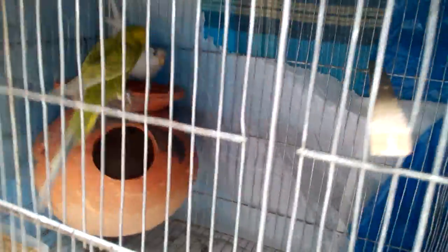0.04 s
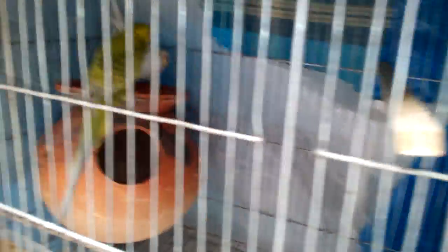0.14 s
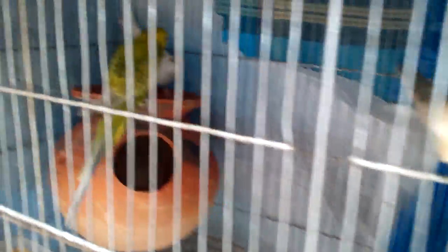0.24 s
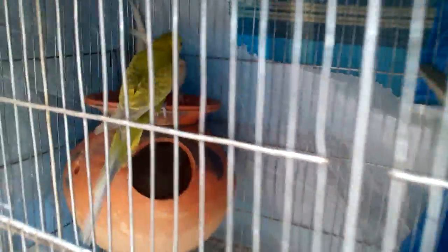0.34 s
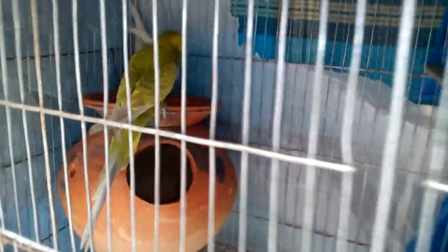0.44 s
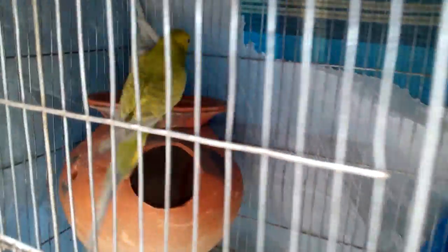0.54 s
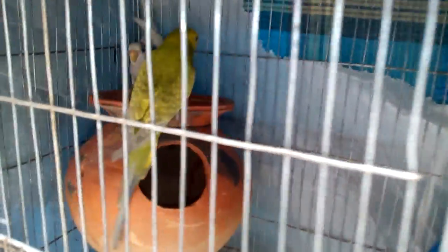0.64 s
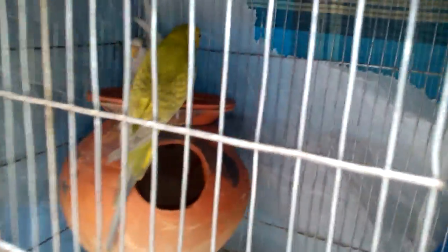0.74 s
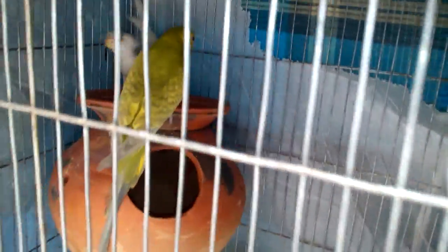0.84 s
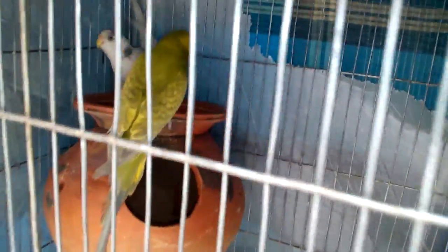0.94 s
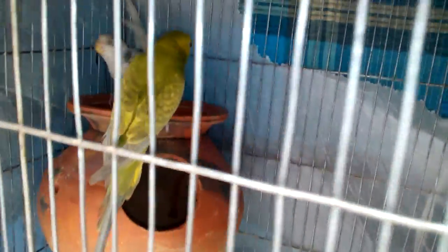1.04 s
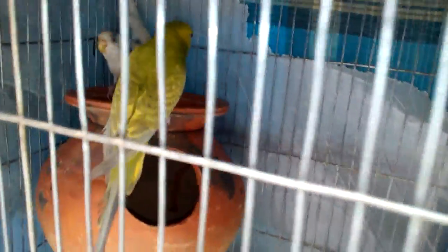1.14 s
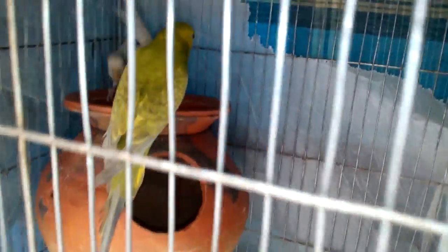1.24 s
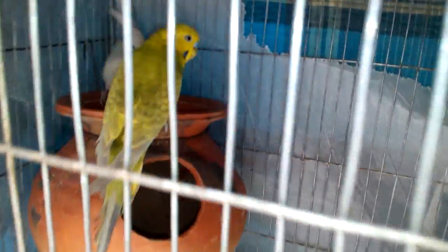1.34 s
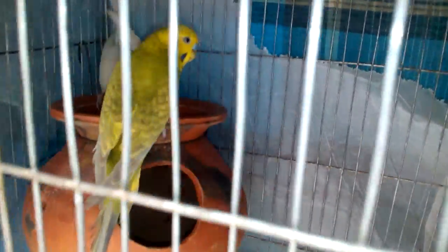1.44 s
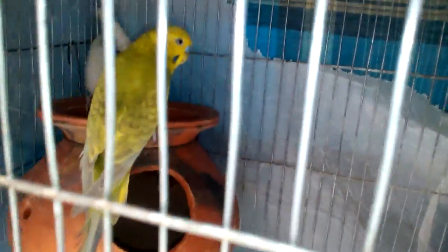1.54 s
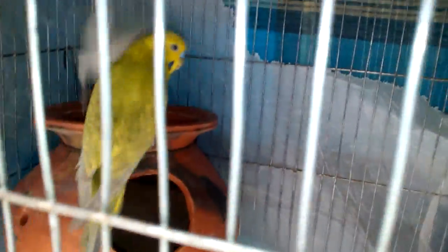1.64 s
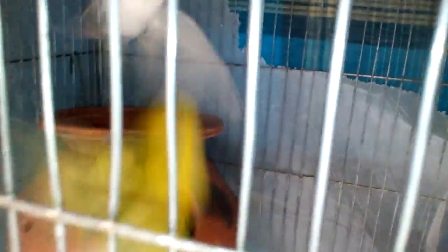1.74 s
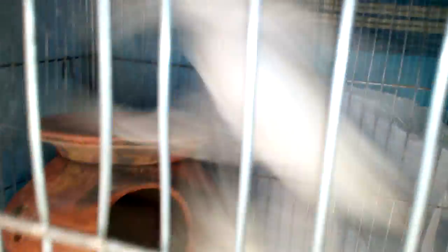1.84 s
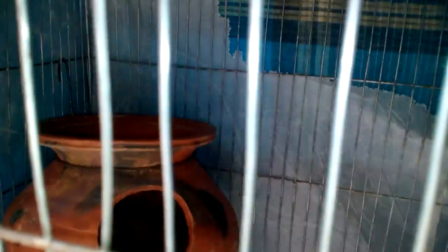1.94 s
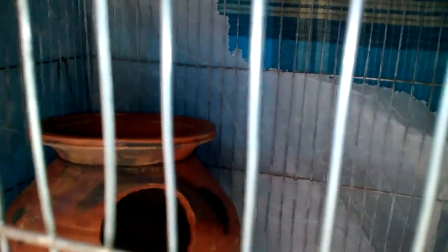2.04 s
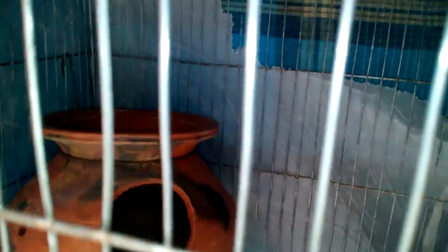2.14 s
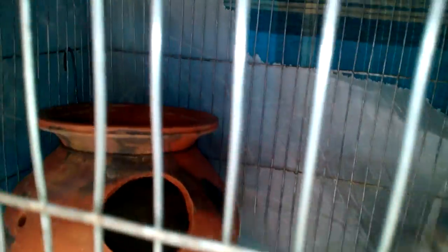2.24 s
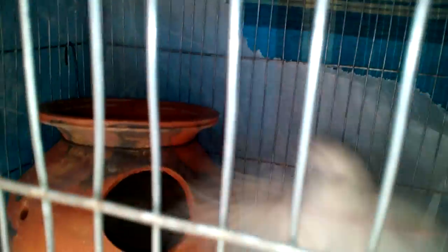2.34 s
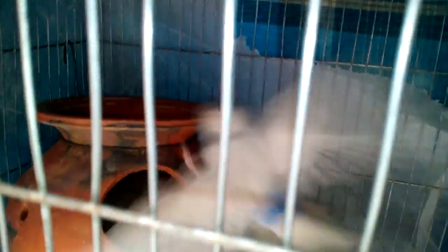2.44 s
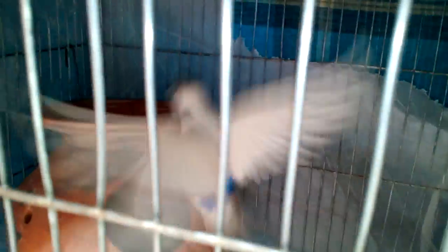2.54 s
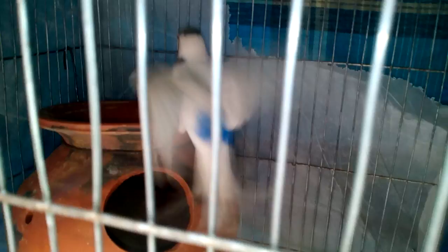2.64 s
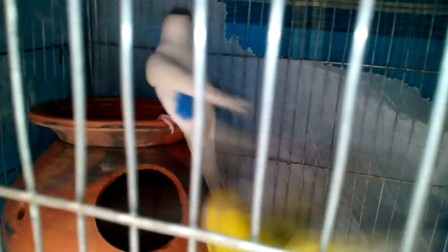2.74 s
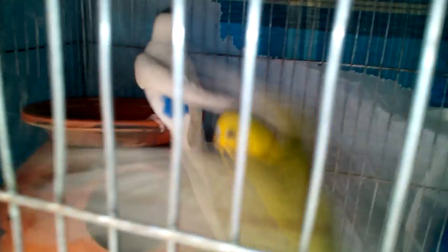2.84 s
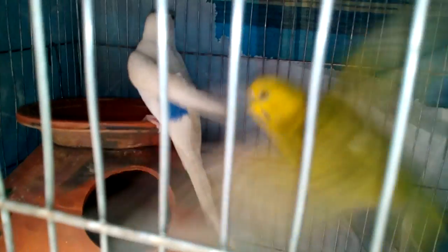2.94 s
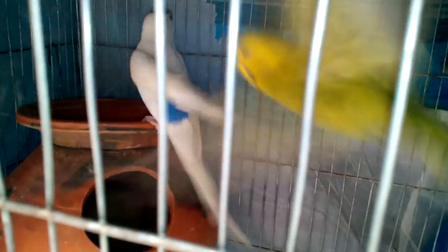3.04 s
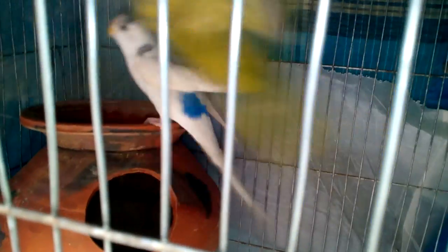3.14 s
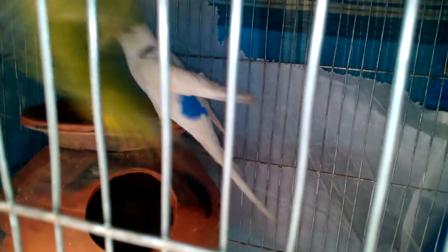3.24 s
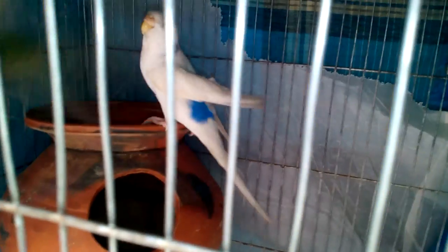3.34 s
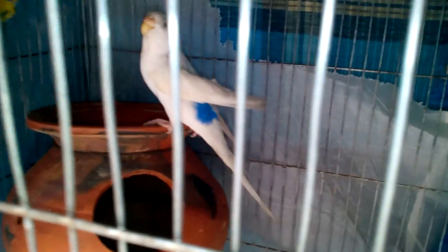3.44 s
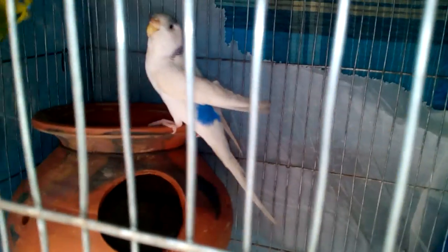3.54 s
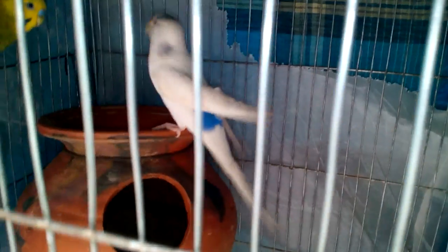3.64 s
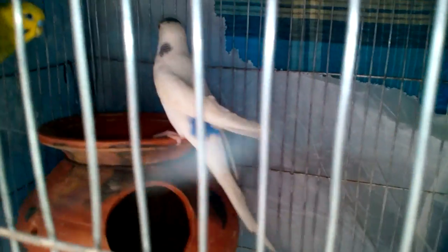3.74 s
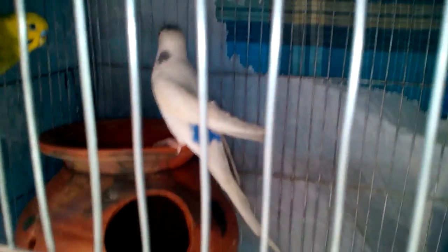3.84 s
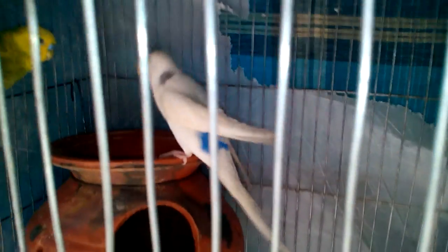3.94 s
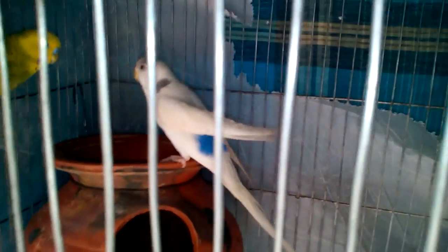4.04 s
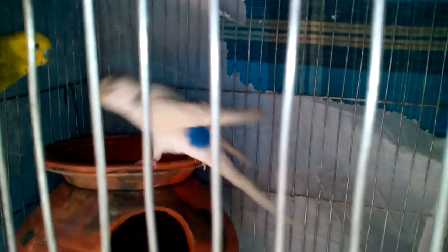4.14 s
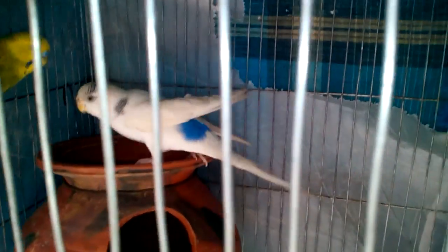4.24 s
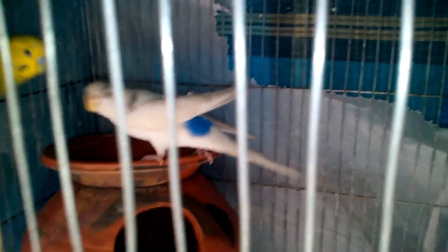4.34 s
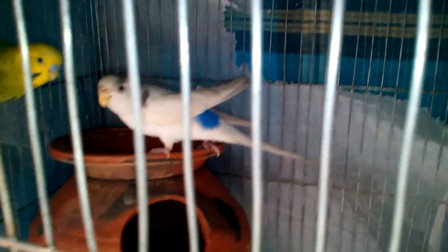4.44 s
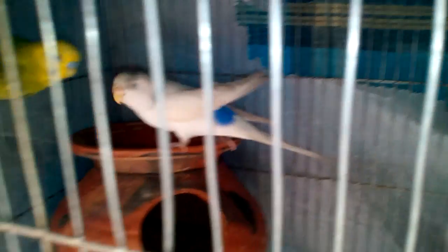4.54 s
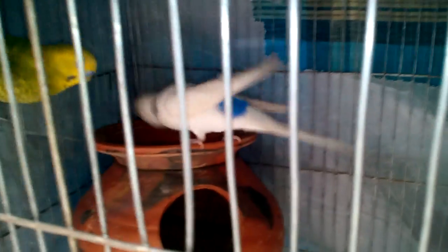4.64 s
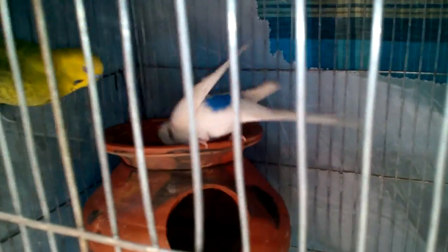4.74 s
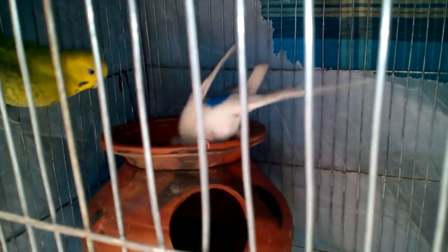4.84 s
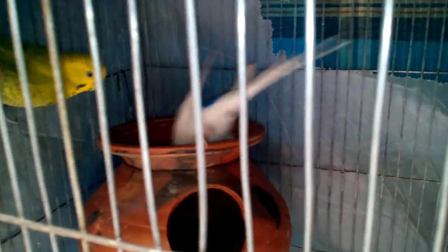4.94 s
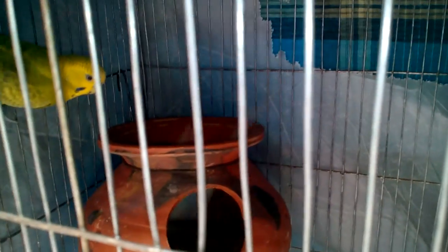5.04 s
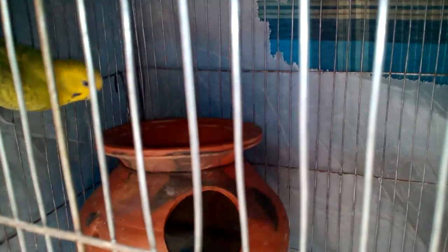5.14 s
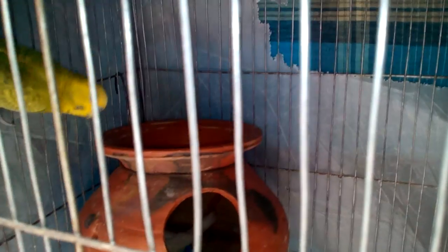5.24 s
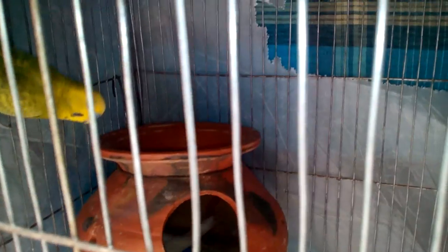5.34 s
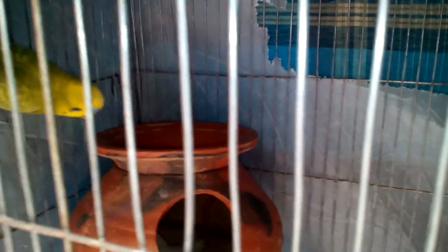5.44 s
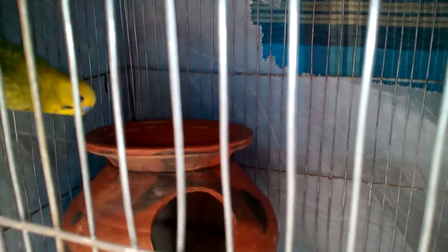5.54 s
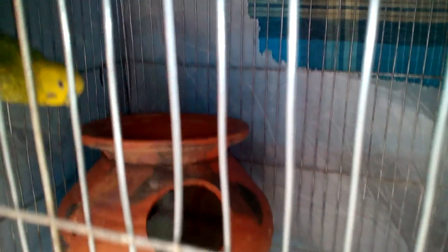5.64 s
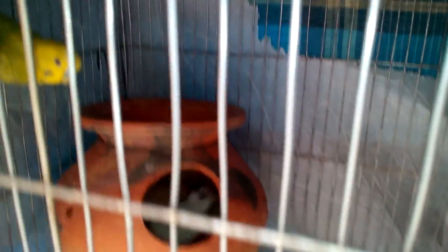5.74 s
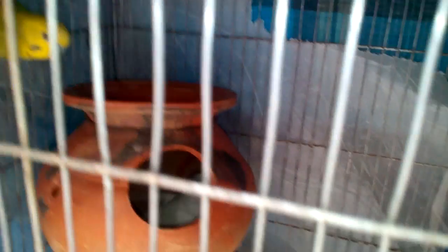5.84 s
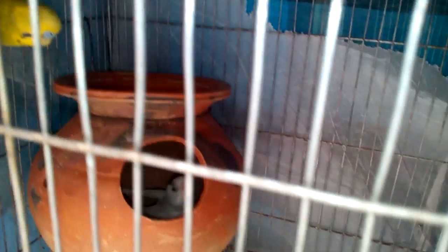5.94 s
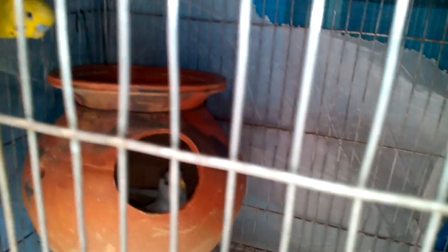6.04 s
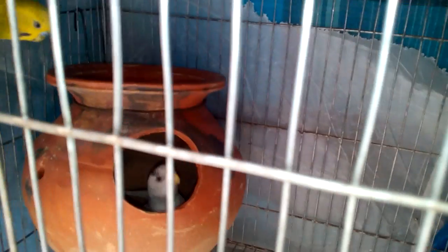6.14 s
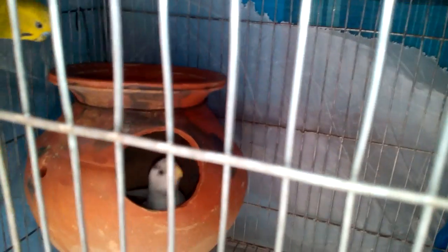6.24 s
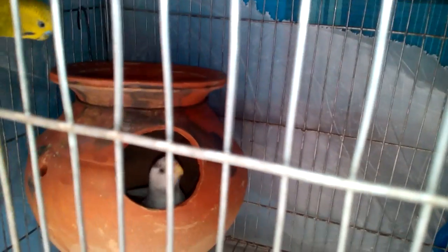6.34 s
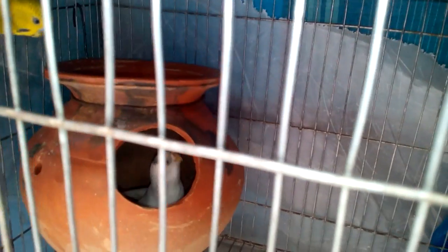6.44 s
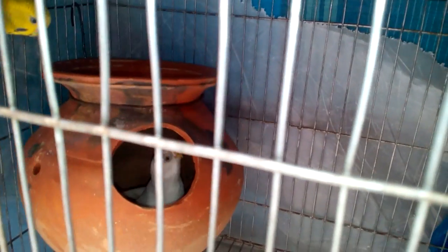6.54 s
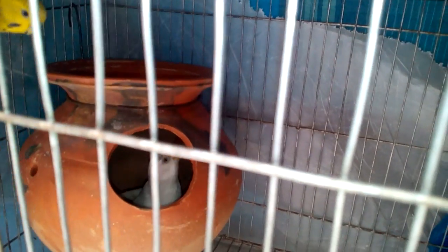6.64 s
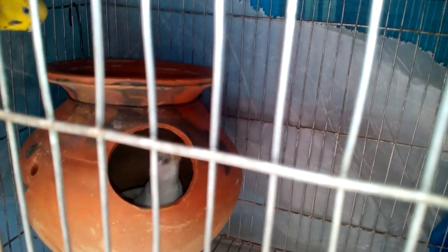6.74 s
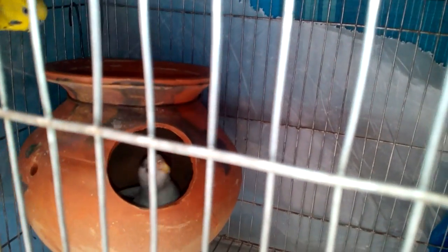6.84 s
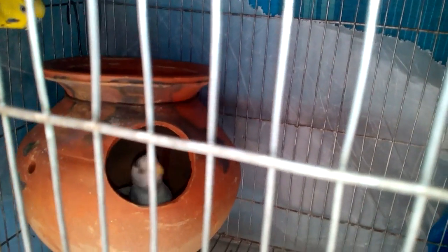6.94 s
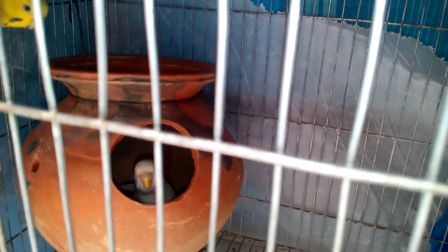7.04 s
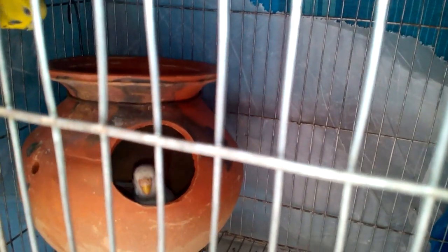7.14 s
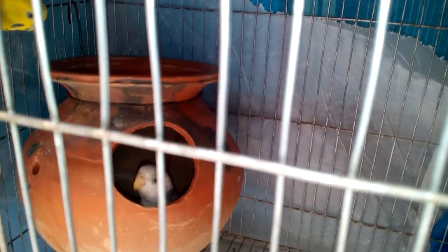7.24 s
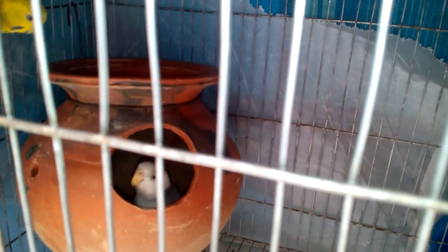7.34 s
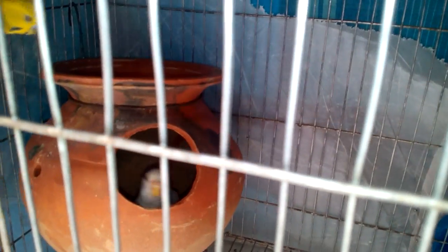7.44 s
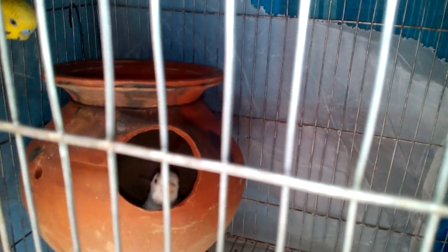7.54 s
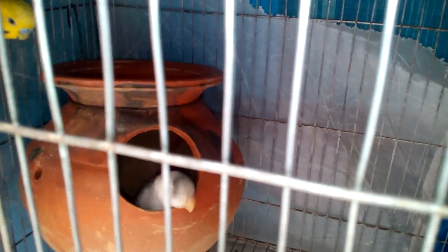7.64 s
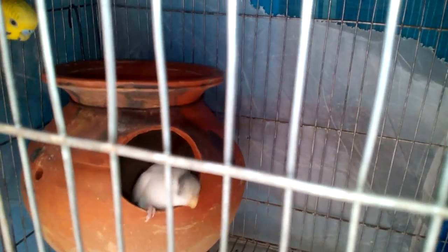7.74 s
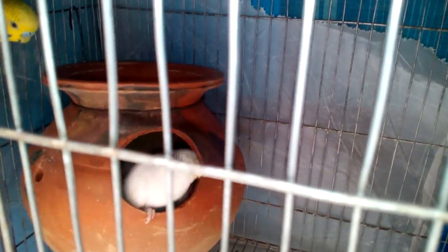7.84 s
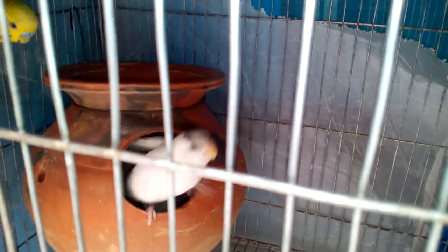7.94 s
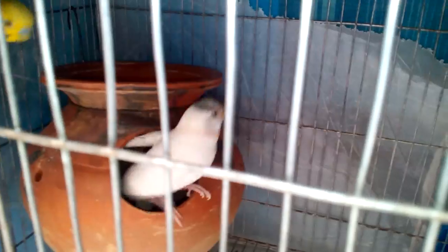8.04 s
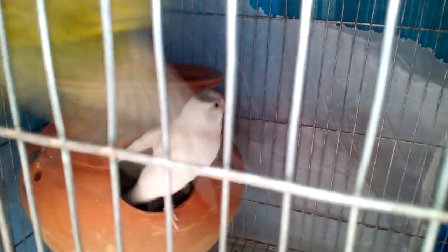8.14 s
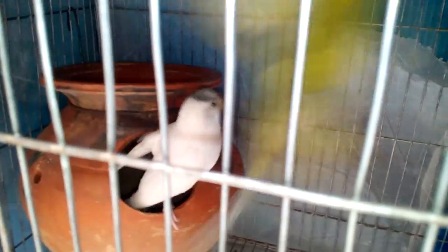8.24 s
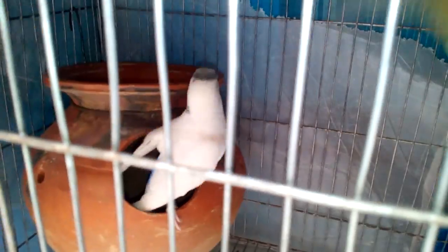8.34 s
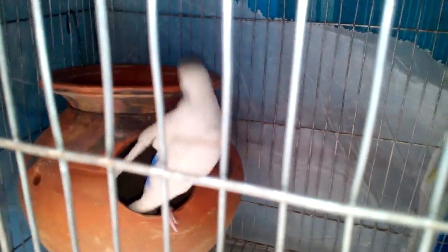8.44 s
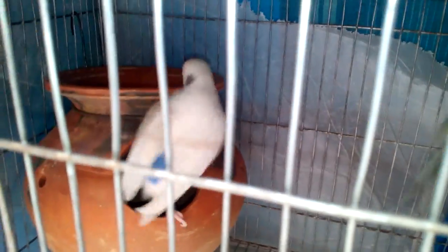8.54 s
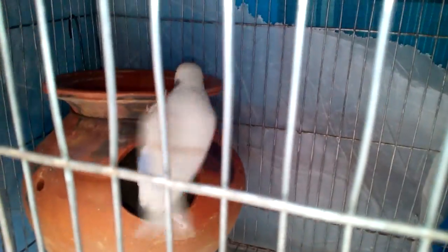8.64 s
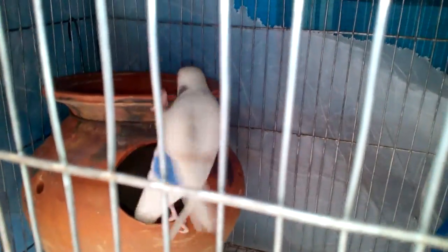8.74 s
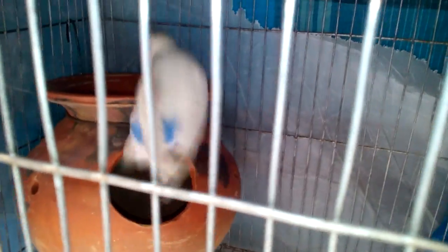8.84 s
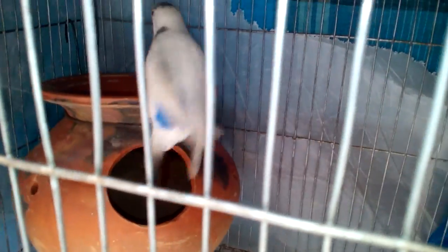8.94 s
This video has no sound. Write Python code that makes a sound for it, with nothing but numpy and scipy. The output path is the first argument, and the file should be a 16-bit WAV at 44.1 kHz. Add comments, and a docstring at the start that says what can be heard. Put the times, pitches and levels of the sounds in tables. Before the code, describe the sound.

A quick harsh squawk, then a fluttering budgie chase with loud screeches, later quiet chatter and claw ticks in a small humming room.

```python
"""A quick, harsh squawk comes first, over room noise and the steady whine of a motor somewhere in the house.
Budgerigars in a wire cage with a clay pot then warble, flap and squawk in a chase, and tick and scrabble.
Calls are gliding tones with overtones; wings, claws and knocks are shaped noise, and the wires ring.
Soft swells and a longer hiss come and go; close reflections and a small room surround the birds."""
import sys
import numpy as np
from scipy import signal
from scipy.fft import rfft, irfft, next_fast_len
from scipy.io import wavfile
from scipy.ndimage import uniform_filter1d, minimum_filter1d, map_coordinates

SR = 44100
rng = np.random.default_rng(int(sys.argv[2]) if len(sys.argv) > 2 else 0)


def dump_mix(stems):
    """Bounce the given channels to the path in sys.argv[1] as a 16-bit WAV at rate SR."""
    frames = np.atleast_2d(stems).T  # one column per channel
    limited = np.clip(frames, -1, 1)  # hard clip at full scale
    pcm = np.round(limited * 32767).astype(np.int16)
    wavfile.write(sys.argv[1], SR, pcm)


N = 396018

# spectrum of bright, scratchy noise, for claws and for breath in the calls: pitch_hz [Hz], level_db [relative dB]
SCRATCH_SPECTRUM = [(6000, -24), (8700, -7.5), (11500, 1), (15500, -2.5)]


def amp(db):
    """Turn decibels into a gain."""
    return 10 ** (np.asarray(db) / 20)


def unit(x):
    """Scale to an rms (average strength) of 1."""
    return x / np.sqrt(np.mean(x ** 2) + 1e-20)


def shaped(x, gain):
    """Filter x by a gain that is a function of frequency."""
    size = next_fast_len(len(x) + 8192)
    spectrum = rfft(x, size) * gain(np.fft.rfftfreq(size, 1 / SR))
    return irfft(spectrum, size)[:len(x)]


def colour(x, points):
    """Filter x through a curve of (Hz, dB) points, joined along a logarithmic pitch scale."""
    point_hz, point_db = np.transpose(points)
    return shaped(x, lambda hz: amp(np.interp(np.log(hz + 1), np.log(point_hz), point_db)))


def noise(points):
    """Make coloured noise of rms 1."""
    return unit(colour(rng.standard_normal(N), points))


def wobble(rate, size=N):
    """Draw a smooth random curve through `rate` random points a second."""
    points = rng.standard_normal(int(size * rate / SR) + 4)
    return map_coordinates(points, [np.arange(size) * rate / SR + 1])


def curves(rows, outside=None):
    """Join the rows into one value per sample, for each column after the time."""
    time_s, *columns = np.transpose(rows)
    return [np.interp(np.arange(N) / SR, time_s, column, outside, outside) for column in columns]


def add(track, start_s, x):
    """Mix x into the track from start_s on."""
    part = track[max(round(start_s * SR), 0):][:len(x)]
    part += x[:len(part)]


def burst(rise, t60):
    """Swell over about `rise` seconds and fall by 60 dB every t60 seconds, with a peak of 1."""
    t = np.arange(SR // 3) / SR
    envelope = (1 - np.exp(-(t / rise) ** 2)) * amp(-60 * t / t60)
    return envelope / envelope.max()


def arch(length, edge):
    """Rise and fall evenly over `length` seconds; a smaller edge makes steeper ends."""
    return np.abs(np.sin(np.linspace(0, np.pi, int(length * SR)))) ** edge


def swells(rows, length, centre_hz, width_hz):
    """Let one band of noise swell and fade from each row's start."""
    level = np.zeros(N)
    for start_s, level_db in rows:
        add(level, start_s, amp(level_db) * arch(length, edge=0.46))

    def band_gain(hz):
        peak = 1 / (1 + (2 * (hz - centre_hz) / width_hz) ** 2)
        return peak * hz / (hz + 120)  # the second part thins out the bass

    return level * unit(shaped(rng.standard_normal(N), band_gain))


def background():
    """Mix steady room noise, brief soft swells and one longer hiss, all made of coloured noise."""
    # spectrum of the room noise: pitch_hz [Hz], level_db [relative dB]
    air_spectrum = [(15, -44), (30, -22), (50, -18.5), (75, -0.5), (110, 1), (160, 0.5), (210, -7),
                    (400, -1.5), (800, -2.5), (1300, -4.5), (2200, -7.5), (4500, -10.5), (6300, -14),
                    (7200, -25.5), (8000, -42), (12000, -67), (15500, -47)]
    # soft narrow swells: start_s [s], level_db [dB]
    soft_swells = [(.56, -40), (1.14, -41.5), (5.22, -42.5), (5.86, -41.5), (8.24, -40.5), (8.86, -41.5)]
    # dull, broad rustles: start_s [s], level_db [dB]
    rustles = [(.52, -54), (7.33, -44)]
    # spectrum of the longer hiss: pitch_hz [Hz], level_db [relative dB]
    hiss_spectrum = [(1800, -13), (2500, -2.5), (3020, 8), (3500, 1), (4400, -1.5), (4640, 7.5), (4950, -2),
                     (6000, -48), (8000, -60)]
    # loudness curve of the hiss: time_s [s], level_db [dB]
    hiss_level = [(6.05, -71), (6.22, -44), (6.45, -41.5), (7.2, -41), (7.36, -45.5), (7.55, -70)]
    air = amp(-44.0) * noise(air_spectrum) * amp(0.37 * wobble(4))
    brief = swells(soft_swells, length=0.4, centre_hz=1820, width_hz=390)
    brief += swells(rustles, length=0.49, centre_hz=550, width_hz=3300)
    hiss = amp(curves(hiss_level, outside=-120)[0]) * noise(hiss_spectrum)
    return air + brief + hiss


def motor():
    """Hum on steady, slightly wavering tones, with one strong whine and a narrow band of noise around it."""
    # tones of the hum: pitch_hz [Hz], level_db [relative dB]
    hum_tones = [(158, -65), (279, -60.5), (728, -58.5), (764, -56), (873, -56.5), (1147, -58),
                 (1620, -67.5)]
    # loudness curve of the whine: time_s [s], level_db [relative dB]
    whine_level = [(0, -52), (1, -44.5), (1.4, -46), (3.9, -46), (5.3, -46), (6.1, -41), (6.7, -40.5),
                   (7.4, -47), (8, -46), (8.98, -41.5)]
    whine_hz = 1740
    t = np.arange(N) / SR
    hum = np.zeros(N)
    for pitch_hz, level_db in hum_tones:
        hum += amp(level_db) * np.sin(2 * np.pi * pitch_hz * t + 1.8 * wobble(14))
    whine = np.sin(2 * np.pi * whine_hz * t + 0.59 * wobble(12)) * amp(0.82 * wobble(45))
    casing = noise([(1300, -58), (1640, -13.5), (1740, -2.5), (1850, -16), (2300, -47.0)])
    return amp(4.0) * hum + amp(curves(whine_level)[0] + 2.0) * whine + amp(-48.0) * casing


def knocks():
    """Birds strike the pot and bars: dry, hard cracks of noise that die at once."""
    # strikes: time_s [s], level_db [relative dB]
    strikes = [(1.931, -13.5), (2.037, -10.5), (2.104, -19), (2.142, -11.5), (2.201, -17.5), (2.387, -26),
               (2.42, 1), (2.898, -7), (2.949, -12), (3.006, -8.5), (8.355, -13), (8.395, -10.5)]
    # spectrum of a crack: pitch_hz [Hz], level_db [relative dB]
    crack_spectrum = [(200, -35), (600, -10), (1000, -5.5), (2000, 3), (3000, -5.5), (4300, 1),
                      (6200, -0.5), (7600, -20.5), (12000, -21), (15500, -15)]
    force = np.zeros(N)
    for time_s, level_db in strikes:
        add(force, time_s - .001, amp(level_db - 9.0) * burst(rise=0.0013, t60=0.022))
    return force * noise(crack_spectrum)


def cage(feathers):
    """Claws and beaks catch and slip on the wires, which ring; brushing wings stir them too."""
    # a claw or beak taps a wire: start_s [s], level_db [relative dB]
    taps = [(.284, -39), (1.558, -42), (4.956, -42), (5.649, -36), (6.005, -39), (6.204, -41), (6.305, -38),
            (6.643, -37), (7.686, -36), (8.005, -38), (8.276, -32), (8.936, -37)]
    # climbing on the wires: start_s [s], length_s [s], level_db [relative dB], brightness_db [relative dB]
    scrabbles = [(4.547, 0.2, -43, -8), (5.05, 0.19, -49.5, 12), (5.301, 0.09, -36.5, 5),
                 (7.548, 0.069, -37, -0.5), (7.93, 0.076, -43, -12), (7.996, 0.062, -34.5, 2),
                 (8.137, 0.051, -43, 1), (8.564, .36, -40.5, -5.5)]
    # ringing tones of the wires: pitch_hz [Hz], level_db [relative dB], t60_s (time to fall by 60 dB) [s]
    wire_tones = [(3130, 7.5, 0.21), (4070, 2.5, 0.67), (4300, -15, .2), (4800, -5, .3),
                  (5500, -7.5, 0.083), (5180, 10, 0.096), (6270, -8.5, 0.5), (6500, -16, .2)]
    # spectrum of a contact: pitch_hz [Hz], level_db [relative dB]
    click_spectrum = [(400, -14), (2000, -11), (3500, -1.5), (5200, 8.5), (6800, 0), (8000, -16),
                      (12000, -25)]
    tap_t60_s = 0.042
    grip_changes_per_s, grip_depth_db = 24.6, 6.5
    force, sharp = np.zeros((2, N))
    for start_s, level_db in taps:
        add(force, start_s, amp(level_db) * burst(rise=0.11 * tap_t60_s, t60=tap_t60_s))
    sharp += amp(-0.5) * force
    for start_s, length_s, level_db, brightness_db in scrabbles:
        bout = arch(length_s, edge=0.28)
        grip = amp(grip_depth_db * wobble(grip_changes_per_s, len(bout)))
        stroke = amp(level_db - 2.5) * bout * grip
        add(force, start_s, stroke)
        add(sharp, start_s, amp(brightness_db) * stroke)
    # fine catches and coarser slips of a claw on a wire
    catches = unit(amp(3.5 * np.tanh(wobble(400)) + 4.5 * np.tanh(wobble(90))))
    contact = amp(-3) * force * catches * noise(click_spectrum)
    scratch = amp(-17.5) * sharp * catches * noise(SCRATCH_SPECTRUM)
    t = np.arange(SR // 3) / SR
    ringing = np.zeros(N)
    for pitch_hz, level_db, t60_s in wire_tones:
        # each spot of contact favours other tones
        drive = (contact + amp(-17) * feathers) * amp(1.8 * wobble(14))
        ring = amp(level_db - 60 * t / t60_s) * np.sin(2 * np.pi * pitch_hz * t)
        ringing += signal.fftconvolve(drive, ring)[:N]
    return contact + scratch + amp(-49) * ringing


def wings():
    """Each beat is a crackly slap with a puff of air; a flurry's rustle brings its whoosh and draught."""
    # wing beats: time_s [s], slap_db (feathers) [relative dB], puff_db (air) [relative dB]
    beats = [(1.871, -15, -55), (1.93, -24, -46), (2.008, -12, -36), (2.038, -4.5, -24), (2.071, -20, -26),
             (2.103, -8, -31), (2.14, -8, -28), (2.198, -19, -34), (2.241, -14, -46), (2.265, -15, -39),
             (2.461, -7.5, -25.5), (2.491, -6.5, -26), (2.573, -10, -35), (2.635, -7, -35.5),
             (2.686, -2, -36), (2.734, -8, -34.5), (2.767, -34, -35.5), (2.838, -16, -38),
             (2.892, 0, -25.5), (2.949, -4.5, -25), (3.001, -6, -36), (3.064, -17, -45),
             (8.354, -15.5, -37), (8.394, -24, -28.5)]
    # a wing fans the microphone: start_s [s], level_db [relative dB]
    fannings = [(2.09, -27.5), (2.26, -35), (3.105, -27), (3.21, -31), (3.395, -36), (3.573, -34),
                (8.395, -33), (8.468, -30.5)]
    # flurries of wings, one curve each: time_s [s], rustle_db [relative dB]
    flurries = [
        [(1.75, -46.5), (1.92, -45), (1.96, -34), (2.25, -33.5), (2.65, -31.5), (2.92, -36), (3.06, -42),
         (3.25, -30.5), (3.55, -41.5), (3.7, -59)],
        [(8.33, -45), (8.39, -44), (8.45, -29.5), (8.56, -48)],
    ]
    # spectra of feathers, whoosh and draught: pitch_hz [Hz], level_db [relative dB]
    feather_spectrum = [(400, -16), (750, -4), (1500, 1), (2700, -4.5), (4500, 0), (5900, -0.5), (6800, -5),
                        (7600, -21.5), (9000, -26.5), (12000, -23.5), (15500, -37.5)]
    whoosh_spectrum = [(120, -16), (300, -8.5), (390, -10.5), (475, 3), (580, -9), (750, -8.5), (1100, -25),
                       (2500, -45)]
    draught_spectrum = [(20, -38), (32, -18), (50, -21.5), (75, 3.5), (140, -0.5), (250, -5.5),
                        (500, -36.5)]
    slap, puff, draught = np.zeros((3, N))
    for time_s, slap_db, puff_db in beats:
        add(slap, time_s - .002, amp(slap_db - 17.5) * burst(rise=0.0032, t60=0.048))
        add(puff, time_s - .002, amp(puff_db) * burst(rise=0.003, t60=0.037))
    for start_s, level_db in fannings:
        add(draught, start_s, amp(level_db) * burst(rise=0.0051, t60=0.14))
    rustle = sum(amp(curves(rows, outside=-120)[0]) for rows in flurries)
    slap += amp(1.5) * rustle
    puff += amp(-9.5) * rustle * amp(4.2 * wobble(35))
    draught += amp(-10) * rustle
    # a bird hovers at the pot's mouth, which swells the whoosh
    pot_middle_s, pot_half_length_s, pot_gain_db = 2.81, 0.37, 8.5
    at_pot = np.exp(-((np.arange(N) / SR - pot_middle_s) / pot_half_length_s) ** 4)
    barbs = unit(amp(1.9 * wobble(600) + 3.34 * wobble(70)))  # feathers catch on each other
    unsteady = unit(amp(1.5 * wobble(45)))
    slap_sound = slap * barbs * noise(feather_spectrum)
    whoosh_sound = puff * amp(pot_gain_db * at_pot) * noise(whoosh_spectrum)
    return slap_sound + whoosh_sound + draught * unsteady * noise(draught_spectrum)


def song(notes, swing_hz, swing_rate, flutter_rate, flutter_db, third_db, edge):
    """The syrinx (voice organ) glides through each syllable; rasp adds overtones and shakes pitch and strength."""
    # filtering by the throat: pitch_hz [Hz], gain_db [relative dB]
    throat = [(900, -37.5), (1800, 1.5), (3000, -5), (5200, 6), (6600, -4), (9000, -5)]
    settle = 1.21  # time constants of the pitch glide in one syllable
    pitch_wander, wander_rate = 0.0304, 130  # share of the pitch at a rasp of 0.3 or more, random points a second
    flutter_swing_hz = 180  # pitch swing at a rasp of 1
    out = np.zeros(N)
    for start_s, length_s, start_hz, end_hz, level_db, rasp in notes:
        u = np.linspace(0, 1, int(length_s * SR))  # progress through the syllable
        size = len(u)
        pitch = start_hz + (end_hz - start_hz) * np.expm1(-settle * u) / np.expm1(-settle)
        drift = 1 + pitch_wander * min(rasp / .3, 1) * wobble(wander_rate, size)
        # a second, uneven oscillation swings the pitch and chops the tone into pulses
        chop_hz = flutter_rate * (1 + .25 * wobble(250, size))
        chop = np.cos(2 * np.pi * np.cumsum(chop_hz) / SR)
        shake_hz = flutter_swing_hz * rasp * chop + swing_hz * rasp * wobble(swing_rate, size)
        phase = 2 * np.pi * np.cumsum(pitch * drift + shake_hz) / SR
        # a harder-driven syrinx gives a stronger octave, up to a limit
        octave_db = min(-29.5 + 46.5 * rasp, 4.5)
        # high notes sound without their upper overtones
        octave = amp(octave_db) * (pitch.mean() < 3650)
        third = amp(octave_db + third_db) * (pitch.mean() < 2800)
        tone = np.sin(phase) + octave * np.sin(2 * phase) + third * np.sin(3 * phase)
        strength = amp(flutter_db * rasp * chop + 3.0 * wobble(218, size))
        voice = unit(colour(tone * strength, throat))
        add(out, start_s, amp(level_db) * voice * np.abs(np.sin(np.pi * u)) ** edge)
    return out


def calls():
    """Soft warbles and harsh squawks share one voice, with a little breathy hiss that follows their strength."""
    # soft syllables: start_s [s], length_s [s], start_hz [Hz], end_hz [Hz], level_db [relative dB],
    # rasp [0 = pure, larger = rougher]
    warble_notes = [(1.572, 0.013, 2500, 2770, -27.5, .6), (1.579, 0.023, 3130, 2760, -30, 0.23),
                    (1.606, 0.027, 1890, 1670, -33, 0.33), (1.626, 0.041, 3030, 2330, -36, .15),
                    (1.664, 0.052, 1890, 1760, -34, 0.2), (4.637, .032, 3430, 2380, -32.5, 0.28),
                    (4.665, 0.015, 2280, 1760, -18.5, 0.52), (4.681, .015, 4080, 3710, -17, 0.27),
                    (4.693, 0.037, 2210, 3090, -26.5, 0.4), (4.728, 0.0285, 2600, 2230, -19.5, 0.17),
                    (4.754, 0.037, 1820, 1820, -24.5, 0.46), (4.793, .021, 2750, 2140, -26, .15),
                    (5.623, 0.031, 2540, 2760, -31, 0.57), (5.648, .032, 2110, 1850, -29, 0.37),
                    (5.677, 0.017, 3500, 2780, -37.5, 0.38), (5.688, 0.031, 2580, 2340, -23.5, 0.04),
                    (5.72, .036, 1760, 1970, -27, 0.2), (5.815, 0.015, 2034, 1790, -25, 0.5),
                    (5.823, .009, 2150, 2580, -19, 0.6), (5.829, 0.038, 3060, 3060, -29.5, 0.17),
                    (5.851, 0.019, 3420, 3480, -16.5, 0.07), (5.866, .034, 2053, 2057, -24, 0.42),
                    (5.878, 0.015, 3600, 3230, -23, .2), (5.885, .019, 2300, 2000, -26, 0.4),
                    (5.901, .007, 3620, 3340, -14.5, 0.06), (5.906, 0.0085, 2400, 2330, -24, 0.53),
                    (7.761, 0.015, 3970, 3200, -17.5, 0.2), (7.778, .028, 2560, 2170, -23.5, 0.23),
                    (7.799, 0.024, 2450, 2520, -27, 0.45), (7.824, .017, 3350, 3410, -17.5, 0.1),
                    (7.841, 0.021, 2725, 2490, -23.5, 0.22), (7.858, .015, 2510, 2240, -17.5, 0.22),
                    (7.88, 0.026, 1720, 2090, -23, 0.3), (7.907, 0.0088, 3800, 2920, -26.5, 0.34),
                    (7.916, 0.0325, 2640, 2217, -19.5, 0.15)]
    # harsh syllables, same columns and units; rasp above 1 is a screech
    squawk_notes = [(.086, 0.042, 1733, 2100, -27, 0.75), (.111, 0.035, 2790, 3000, -21, 0.7),
                    (.138, 0.022, 2990, 3500, -23.5, 0.66), (.15, 0.096, 3090, 2890, -40.5, 0.78),
                    (2.461, 0.062, 2950, 3260, -17, 0.8), (2.512, 0.031, 4300, 3700, -21.5, 1.35),
                    (3.102, 0.031, 1450, 2200, -18.5, 0.7), (3.122, .033, 2300, 3000, -7.5, 0.61),
                    (3.146, 0.03, 3250, 3500, -15, 0.68), (3.209, 0.031, 2210, 2680, -13, 1.3),
                    (3.235, 0.028, 2646, 2900, 2, 0.94), (3.26, 0.033, 3880, 3740, -12, 0.37),
                    (3.294, 0.027, 3580, 3380, -7, 1.26), (3.303, 0.014, 4420, 5150, -5.5, 0.98),
                    (3.37, 0.034, 2274, 3100, -9.5, 1.6), (3.386, 0.029, 3180, 3200, -7.5, 0.68),
                    (3.459, 0.031, 2376, 2520, -16.5, 0.72), (3.474, 0.026, 3490, 4330, -7.5, 2),
                    (3.491, .022, 3566, 3400, -7, .75), (3.508, 0.034, 3280, 3150, -16.5, 0.68),
                    (3.522, 0.031, 2740, 2330, -14, 1.06), (3.566, .026, 1995, 2425, -15.5, 1.7),
                    (8.436, 0.0075, 2330, 2720, -9, 0.62), (8.444, 0.015, 2460, 2770, -7, .72),
                    (8.456, 0.033, 2760, 3080, -15.5, 0.56), (8.485, 0.027, 3270, 4000, -17.5, 0.47),
                    (8.499, 0.019, 4440, 3730, -12.5, 1.7)]
    warble = song(warble_notes, swing_hz=300, swing_rate=1200, flutter_rate=300,
                  flutter_db=6, third_db=-13, edge=.6)
    squawks = song(squawk_notes, swing_hz=300, swing_rate=1500, flutter_rate=520,
                   flutter_db=7, third_db=-6, edge=.65)
    voices = colour(warble + squawks, [(6700, -1), (7300, -10.0), (7900, -20.0), (15000, -33.0)])
    return voices + amp(-36.5) * np.abs(voices) * noise(SCRATCH_SPECTRUM)


def room(x, t60, wet_db):
    """Add a few close reflections and a short, weak answer from the walls, made of fading noise."""
    # reflections from the pot and nearby walls: delay_s [s], level_db [dB]
    echoes = [(.0013, -26), (.0031, -19), (.0052, -18), (.0083, -22.5), (0.0122, -22.5)]
    t = np.arange(SR // 2) / SR
    tail = rng.standard_normal(len(t)) * amp(-60 * t / t60) * (t > .002)
    out = x + amp(wet_db) * signal.fftconvolve(x, tail / np.linalg.norm(tail))[:N]
    for delay_s, level_db in echoes:
        add(out, delay_s, amp(level_db) * x)
    return out


def scene():
    """Put the birds and cage close by in the room, and the house behind."""
    feathers = wings()
    near = calls() + feathers + knocks() + cage(feathers)
    return (room(near, t60=0.18, wet_db=-16.5) + motor() + background())[None]


def record(dry):
    """Limit and softly clip the loudest peaks, shape the tone as the microphone does and cut the very top."""
    # response of the microphone: pitch_hz [Hz], gain_db [dB]
    microphone = [(15, -26), (40, -1.5), (7500, 0), (8100, -12), (8700, -1), (12500, -5.5), (13500, -16.5),
                  (15800, -14.5)]
    limit_db, window_s, clip_db, top_hz = 1.5, .002, -.3, 15800
    size = int(window_s * SR)
    needed_gain = np.minimum(1, amp(limit_db) / (np.abs(dry[0]) + 1e-9))
    # hold the lowest gain around each peak, then smooth it
    limited = dry[0] * uniform_filter1d(minimum_filter1d(needed_gain, size), size)
    clipped = limited / (1 + np.abs(limited / amp(clip_db)) ** 12) ** (1 / 12)
    return shaped(colour(clipped, microphone), lambda hz: hz < top_hz)[None]


dry = scene()
out = record(dry)
dump_mix(out)
```